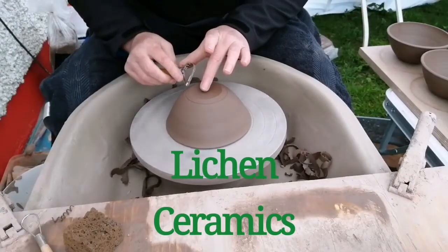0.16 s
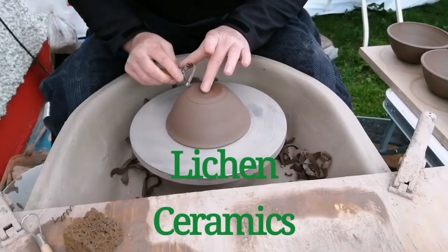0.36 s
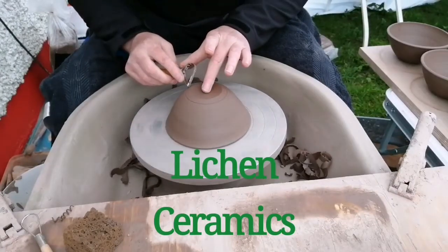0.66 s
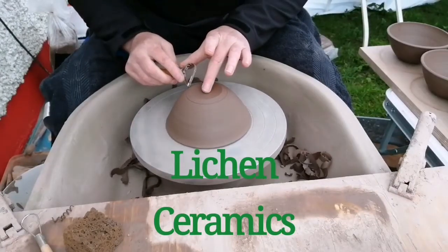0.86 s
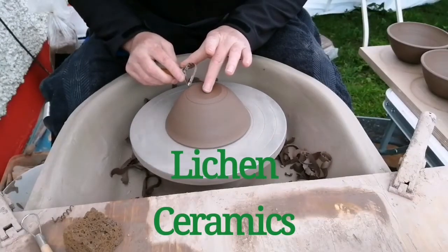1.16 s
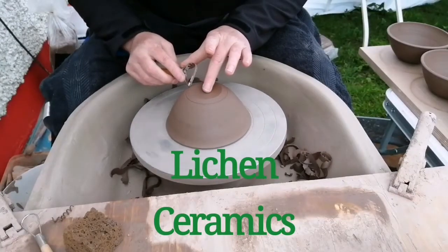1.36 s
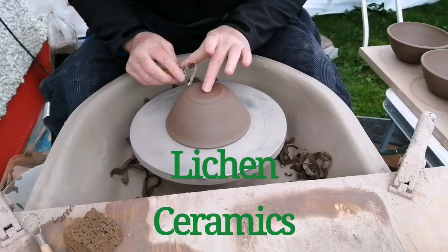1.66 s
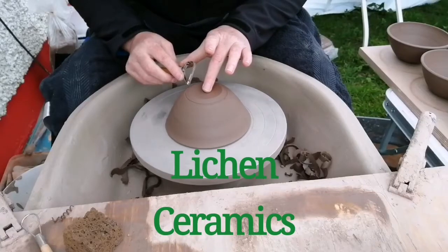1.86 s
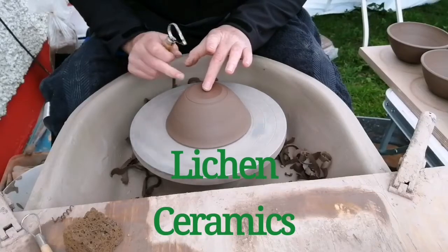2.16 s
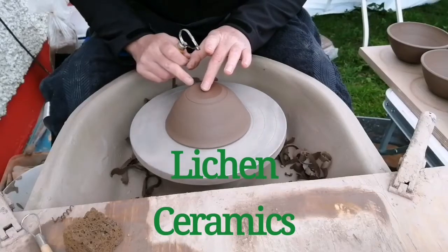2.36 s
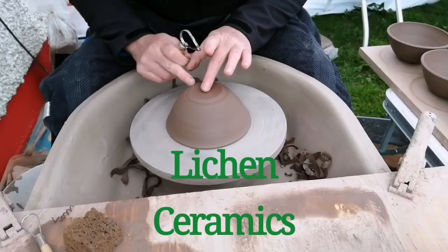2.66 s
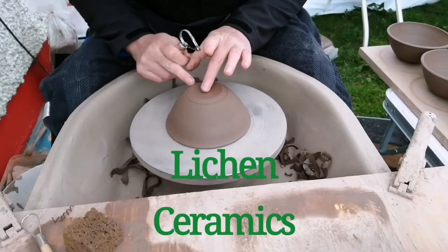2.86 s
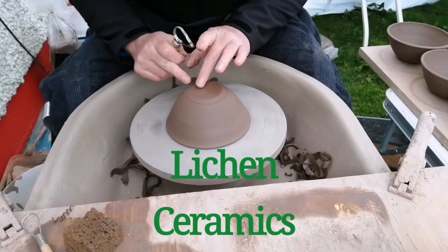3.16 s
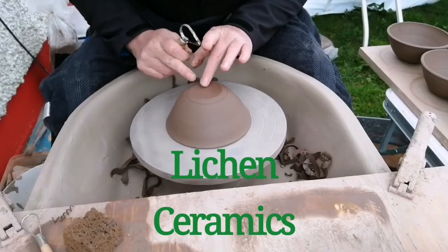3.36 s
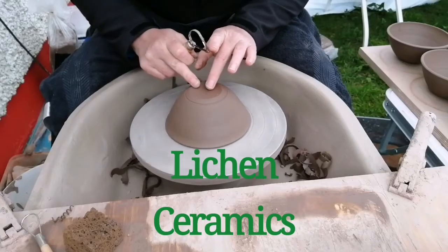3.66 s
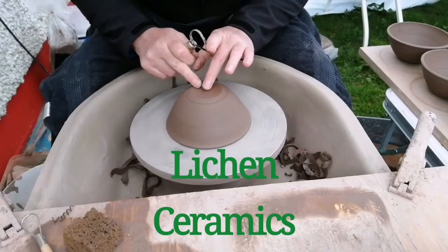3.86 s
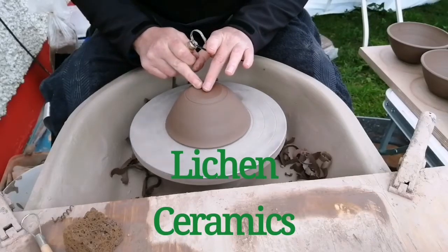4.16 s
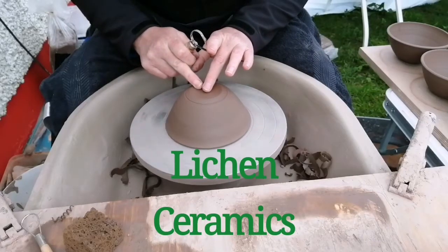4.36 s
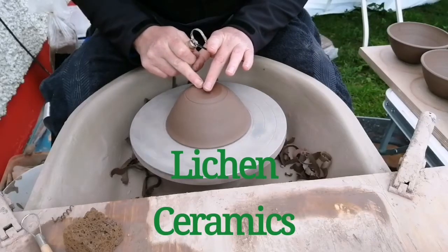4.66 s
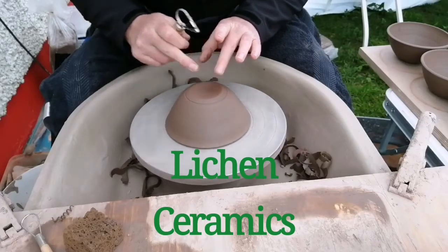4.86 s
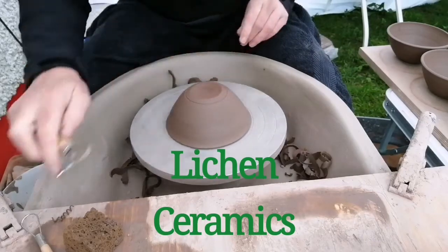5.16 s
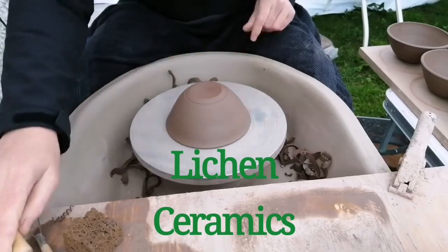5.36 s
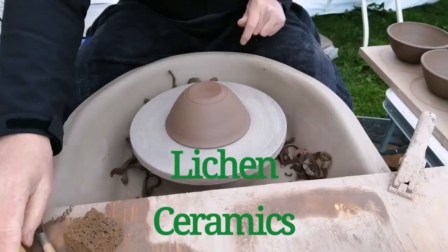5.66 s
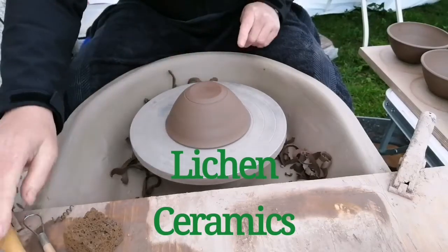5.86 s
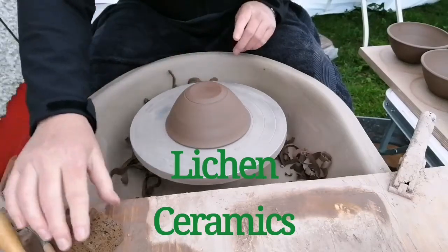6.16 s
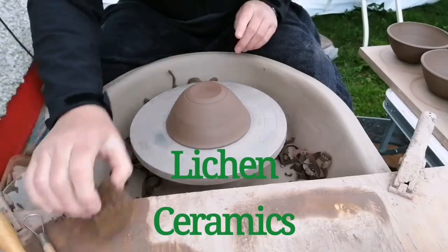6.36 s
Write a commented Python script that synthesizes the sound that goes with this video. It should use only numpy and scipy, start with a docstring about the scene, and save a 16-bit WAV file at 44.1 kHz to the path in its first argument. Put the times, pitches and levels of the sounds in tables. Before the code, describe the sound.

Close up in a garden, an electric potter's wheel runs with a low, beating hum and soft belt thumps several times a second. Halfway through, a distant small bird gives a falling run of thin whistles and buzzy notes, echoing off walls. Then a sleeve swishes, a dull thud and knocks sound on a plastic tray, the wheel slows and stops, leaving faint mains hum, and a steel tool lands with a sharp, bright clink.

```python
"""In a garden, an electric potter's wheel turns: bumps in its belt thump the housing and beat against the motor's hum.
A small bird sings a falling run of whistles and two groups of buzzes among echoing walls. The potter reaches out
with a swish of the sleeve, the wheel stops, leaving the mains hum, and a steel trimming tool is put down with knocks
and a sharp clink. Pitched sounds are built from sine waves and ringing modes, hisses from shaped noise."""
import sys
import numpy as np
from scipy import signal
from scipy.fft import rfft, irfft, next_fast_len
from scipy.io import wavfile
from scipy.ndimage import map_coordinates

SR = 44100
rng = np.random.default_rng(int(sys.argv[2]) if len(sys.argv) > 2 else 0)


def transcribe(u):
    """Save the signal u as a 16-bit wav file named by the first command-line argument.

    u: samples, shape (n,) or (channels, n), limited to [-1, 1]; the rate is SR.
    q: integer samples, one column per channel.
    """
    v = np.clip(np.atleast_2d(u).T, -1, 1)
    q = np.round(v * 32767).astype(np.int16)
    wavfile.write(sys.argv[1], SR, q)


N = 287091
T = np.arange(N) / SR  # time of every sample [s]


def amp(db):
    """Turn decibels into a gain."""
    return 10 ** (np.asarray(db) / 20)


def unit(x):
    """Scale a sound to an average (rms) strength of 1."""
    return x / np.sqrt(np.mean(x ** 2) + 1e-20)


def along(points, hz):
    """Read a curve of (Hz, value) points, joined by straight lines on a log frequency axis."""
    f, v = np.transpose(points)
    return np.interp(np.log(hz + 1), np.log(f + 1), v)


def wobble(rate):
    """A smooth random curve with so many random points a second."""
    knots = rng.standard_normal(int(N * rate / SR) + 4)
    return map_coordinates(knots, [T * rate])


def filtered(x, response):
    """Multiply the spectrum of x by a response that depends on frequency."""
    m = next_fast_len(N + SR // 2)
    hz = np.fft.rfftfreq(m, 1 / SR)
    return irfft(rfft(x, m) * response(hz), m)[..., :N]


def pan(db):
    """Left and right gains for a level difference; positive leans left."""
    return amp(np.array([[.5], [-.5]]) * db)


def add(track, s, sound):
    """Mix a stereo sound into the track at time s."""
    part = track[:, round(s * SR):][:, :sound.shape[1]]
    part += sound[:, :part.shape[1]]


def fade(s, t60, attack):
    """Loudness curve of a blow at time s: a quick rise, then a drop of 60 dB in t60 seconds."""
    age = np.maximum(T - s, 0)
    return amp(-60 * np.minimum(age / t60, 3)) * (1 - np.exp(-age / attack))


def tones(rows, turns, scatter=0, waver_db=0):
    """Cosines at multiples of a count of turns; scatter sets them out of step, and each wavers on its own."""
    total = 0
    for multiple, db in rows:
        level = amp(db + waver_db * wobble(11))
        total = total + level * np.cos(2 * np.pi * (round(multiple) * turns + scatter * rng.random()))
    return np.sqrt(2) * total


def ring(modes, attack, pitch=1, sustain=1):
    """Fading sine modes, struck at new strengths each time; higher ones reach the two ears less alike."""
    t = np.arange(SR // 3) / SR
    waves = 0
    for k, (hz, db, t60) in enumerate(modes):
        level = amp(db + rng.normal(0, 1.9) - 60 * t / (t60 * sustain))
        ear_phase = rng.normal(0, hz / 900, (2, 1))
        waves = waves + (-1) ** k * level * np.sin(2 * np.pi * pitch * hz * t + ear_phase)
    return waves * (1 - np.exp(-t / attack)) / np.sqrt(len(modes) / 2)


# How alike noise is in the two ears: (frequency [Hz], likeness [0 to 1])
EAR_LIKENESS = [(40, 0.82), (150, 1), (300, 0.96), (550, 0.66), (1000, 0), (2000, 0.069), (5000, 0),
                (15000, 0)]
# How noise leans to the left: (frequency [Hz], left-right difference [dB])
NOISE_LEAN = [(30, 5), (60, 8), (150, -3.5), (300, -2.5), (600, 1), (1200, 3), (2500, 1.5), (6000, 4.5),
              (7800, -3), (10000, -0.5), (15000, 4)]


def rush(spectrum, ripple_db=0):
    """Stereo noise of rms 1, alike in the bass and unrelated in the treble; nearby surfaces ripple its spectrum."""
    def mid_and_side(hz):
        turn = np.arccos(np.clip(along(EAR_LIKENESS, hz), -1, 1)) / 2
        return amp(along(spectrum, hz)) * [np.cos(turn), np.sin(turn)]

    def lean_and_ripple(hz):
        # a separate ripple for each ear, with a random point every 25 Hz
        ripple = np.array([map_coordinates(row, [hz / 25]) for row in rng.standard_normal((2, SR // 25))])
        return pan(along(NOISE_LEAN, hz)) * amp(ripple_db * ripple)

    mid, side = filtered(rng.standard_normal((2, N)), mid_and_side)
    return unit(filtered(np.array([mid + side, mid - side]), lean_and_ripple))


EASE_S, HALT_S = 5.4, 6.06  # the pedal is eased, then the wheel halts [s]


def coasting():
    """0 while the pedal is down, rising to 1 as the wheel halts."""
    return np.clip((T - EASE_S) / (HALT_S - EASE_S), 0, 1)


COAST_LOSS_DB = -12  # the drive's change in level by the end of the coast
HALT_T60 = 0.46  # time to drop a further 60 dB after the halt [s]


def effort_db():
    """The drive quietens as it coasts and dies away at the halt."""
    return COAST_LOSS_DB * coasting() - 60 * np.maximum(T - HALT_S, 0) / HALT_T60


BELT_HZ, MOTOR_HZ = 5.3832, 24.897  # belt loops and motor turns a second, before the coast
MOTOR_START = .0362  # moment that sets the motor's phase [s]
COAST_SLOWING = .1  # share of the speed lost during the coast
# Bumps in one loop of the belt: (time into the loop [s], relative level [dB])
BELT_BUMPS = [(.0246, 0), (.0393, 1.3), (.1179, -.9)]
# Ringing modes of the wheel housing: (frequency [Hz], width [Hz], relative level [dB])
HOUSING_MODES = [(124, 41, 7), (153.53, 10.8, 22.5), (169.5, 10.3, 15), (196, 5.5, 13.5), (237, 5.7, 13.5),
                 (76.3, 43, -3), (285, 67, -7.5)]
# Hum of the motor: (multiple of its turning speed [count], rms level [dB])
MOTOR_ORDERS = [(5, -63), (6, -48.5), (8, -60.5), (12, -68), (15, -73.5)]
# Grinding noise of the bearings: (frequency [Hz], relative level per hertz [dB])
GRIND_SPECTRUM = [(30, -32), (70, -14), (190, -4), (300, -6.5), (350, -12), (410, -4.5), (465, -10),
                  (540, -10.5), (700, -10.5), (1250, -21), (2100, -26), (5000, -42.5), (8000, -57)]


def drive(belt_db=-1.0, scatter_db=1.0, grind_db=-57, chafe_db=-53, pulse_db=3.0, soft_hz=1500, flutter_turns=0.01):
    """Belt bumps ring the housing; the motor's sixth order lies close to that ring, so the two beat."""
    run_time = np.cumsum(1 - COAST_SLOWING * coasting()) / SR  # a clock that slows with the wheel
    loops = np.arange(int(run_time[-1] * BELT_HZ)) / BELT_HZ
    blows = np.zeros(N)
    for s, db in BELT_BUMPS:
        blows[np.searchsorted(run_time, loops + s)] += amp(db + scatter_db * rng.standard_normal(len(loops)))

    def housing(f):
        return sum((-1) ** k * amp(db) * 1j * f * width / (hz * hz - f * f + 1j * f * width)
                   for k, (hz, width, db) in enumerate(HOUSING_MODES))

    # soft rubber blows carry little treble
    thumps = amp(belt_db) * filtered(blows, lambda f: housing(f) / (1 + (f / soft_hz) ** 2))
    # the belt rubs on between bumps
    chafe = amp(chafe_db) * unit(filtered(rng.standard_normal(N), housing))
    turns = MOTOR_HZ * (run_time - MOTOR_START)
    motor = tones(MOTOR_ORDERS, turns + flutter_turns * wobble(12), waver_db=0.5)
    # the bearings grind harder once per motor turn and once per belt loop
    motor_load = np.cos(2 * np.pi * turns)
    belt_load = np.cos(2 * np.pi * BELT_HZ * (run_time - BELT_BUMPS[-1][0]))
    grind = amp(grind_db + pulse_db * (motor_load + belt_load)) * rush(GRIND_SPECTRUM, ripple_db=3.5)
    return amp(effort_db()) * (pan(3.4) * (thumps + chafe + motor) + grind)


FLUTTER_PER_CYCLE = 0.025  # flutters per cycle of the pitch: higher notes flutter faster


def note(length, end_hz, db, slide, swing_hz, pulse_db, uneven=0.4, quaver_db=3.0, overtone_db=-21, settle=4):
    """One whistle that swoops down towards its pitch and flicks up again and again, loudest as each flick falls."""
    t = np.arange(int(length * SR)) / SR
    flutter = 2 * np.pi * (FLUTTER_PER_CYCLE * end_hz * t + uneven * wobble(49.23)[:len(t)])
    swoop = end_hz * (1 + slide * np.exp(-settle * t / length))
    flicks = swing_hz * ((1 + np.sin(flutter)) / 2) ** 2
    phase = 2 * np.pi * np.cumsum(swoop + flicks) / SR
    reedy = end_hz * (1 + slide) < 3400  # only the lowest notes have an overtone
    overtone = amp(overtone_db) * np.sin(3 * phase) * reedy
    pulses = unit(amp(quaver_db * wobble(68)[:len(t)] - pulse_db * np.cos(flutter)))
    edges = signal.windows.tukey(len(t), .45)
    return np.sqrt(2) * amp(db) * pulses * edges * (np.sin(phase) + overtone)


# How long the garden's echo lasts: (frequency [Hz], time to drop 60 dB [s])
GARDEN_ECHO = [(3200, 0.8), (6000, 0.65), (8000, 0.41)]
ECHO_RISE_S = 0.013  # the diffuse echo takes a moment to build


def echo(x, clump_db=4):
    """Walls and trees throw a sound back in uneven clumps; each frequency dies at its own speed."""
    hz, t, noise = signal.stft(rng.standard_normal((2, SR * 3 // 4)), SR, nperseg=256)
    clumps = clump_db * rng.standard_normal(len(t))
    decay = amp(clumps - 60 * t / along(GARDEN_ECHO, hz)[:, None])
    tail = signal.istft(noise * (1 - np.exp(-t / ECHO_RISE_S)) * decay, SR, nperseg=256)[1]
    return signal.fftconvolve(x[None], tail / np.linalg.norm(tail[0]), axes=1)


# Three tables of notes, each with the columns (time [s], length [s], pitch the swoop nears [Hz],
# relative level [dB], downward slide [share of the pitch]).
# Single whistles, the last two sung above the low buzzes
SINGLE_WHISTLES = [(3.1, 0.11, 6950, -58, 0.03), (3.21, 0.068, 6180, -55.5, 0.23),
                   (3.33, 0.026, 5090, -63, 0.074), (3.427, 0.031, 5650, -58, 0.035),
                   (3.9, 0.0713, 3112, -46, 0.038), (3.995, 0.031, 2540, -55, 0.265),
                   (4.035, 0.053, 7000, -63.5, 0.089), (4.255, 0.029, 5070, -65, 0.012),
                   (4.843, 0.064, 3820, -60, 0.012), (5.058, 0.024, 3776, -50, 0.022)]
# Downward swoops: a falling run, and two more that end the song
FALLING_RUN = [(3.455, 0.083, 6630, -46.5, 0.11), (3.535, 0.05, 5330, -50.5, 0.2),
               (3.612, 0.05, 4620, -54.5, 0.35), (3.692, .06, 3583, -50, .5),
               (3.785, 0.053, 2835, -51, 0.32), (5.066, 0.0403, 2920, -48.5, 0.31),
               (5.14, 0.12, 3125, -53.5, 0.049)]
# Closing buzzes, first high, then low
CLOSING_BUZZES = [(4.325, .06, 7280, -59, 0.0088), (4.368, 0.075, 7050, -50, 0.11),
                  (4.5, 0.105, 7350, -49, 0.018), (4.68, 0.098, 7230, -48, 0.04),
                  (4.85, 0.1, 2880, -54, 0.3), (4.97, 0.08, 3080, -55.5, 0.22)]
# How the bird reaches the two ears: (frequency [Hz], left-right difference [dB])
SONG_LEAN = [(3000, 2.5), (6900, 5.5), (7400, -3.5)]
WHISTLE_SWING_HZ, RUN_SWING_HZ, BUZZ_SWING_HZ = 101.6, 250, 558  # how far the pitch flicks up
WHISTLE_PULSE_DB, BUZZ_PULSE_DB = 1.5, 2.5  # how deeply the flutter chops a note
BOUNCE_S, BOUNCE_LOSS_DB = .04, 4.5  # round trip between two facing walls, and the loss on each


def bird(direct_db=-6.5, echo_db=-0.5):
    """Whistles, a falling run and buzzes from far off, heard mostly through their echoes."""
    song = np.zeros((2, N))
    for rows, swing_hz, pulse_db in [(SINGLE_WHISTLES, WHISTLE_SWING_HZ, WHISTLE_PULSE_DB),
                                     (FALLING_RUN, RUN_SWING_HZ, WHISTLE_PULSE_DB),
                                     (CLOSING_BUZZES, BUZZ_SWING_HZ, BUZZ_PULSE_DB)]:
        for s, length, hz, db, slide in rows:
            call = note(length, hz, db, slide, swing_hz, pulse_db)
            sides = pan(along(SONG_LEAN, hz))
            for trip in range(4):  # trip 0 is the direct sound
                arrival = s + trip * BOUNCE_S + .001 * rng.random()
                add(song, arrival, sides * amp(direct_db - BOUNCE_LOSS_DB * trip) * call)
            add(song, s, sides * amp(echo_db) * echo(call))
    return song


# Knocks on the splash tray: (time [s], dull thud level [dB], hard tap level [dB],
# pitch of the thud [ratio], ring time of the thud [ratio])
TRAY_KNOCKS = [(5.408, -38, -63, 0.64, 0.9), (5.4498, -19.5, -46, 0.916, 0.45),
               (5.476, -34, -44, 1.02, 1.2), (5.512, -31.5, -48.5, 0.8, 0.69),
               (5.608, -42.5, -45.5, 1.05, 1), (5.737, -48.5, -34.5, 1, 1.2),
               (5.836, -37.5, -29, 1.03, 0.87), (5.848, -37, -31, 1.2, 0.6),
               (5.876, -35.5, -51, 0.68, 0.87), (6.348, -35.5, -44, 1, 0.87)]
# Low modes of the tray, before each knock's ratios: (frequency [Hz], relative level [dB], time to drop 60 dB [s])
THUD_MODES = [(166.3, -3, 0.28), (234.5, 7, 0.2), (310, -5, 0.051), (386.5, -6.5, 0.2), (434, -6.5, 0.15),
              (614, -11.5, 0.15)]
# High modes of the tray: (frequency [Hz], relative level [dB], time to drop 60 dB [s])
TAP_MODES = [(441, 0.5, 0.05), (583.7, 1.5, 0.096), (667, 4.5, 0.056), (753, 3, 0.068), (833, 0.5, 0.06),
             (986, -7.5, 0.069), (1094, -18, .09), (1450, -9.5, 0.045)]
# Loose things rattling on the tray: (frequency [Hz], relative level per hertz [dB])
RATTLE_SPECTRUM = [(300, 12.5), (800, 10), (1450, -5.5), (1850, 4), (2900, 5.5), (4000, -6.5),
                   (15000, -19.5)]
# Loose tools touch each other: (time [s], tick level [dB], jingle level [dB])
TOOL_TICKS = [(5.323, -44, -66), (5.739, -47.5, -58), (5.838, -60, -46), (5.875, -71, -50)]
# Modes of the tick: (frequency [Hz], relative level [dB], time to drop 60 dB [s])
TICK_MODES = [(1560, -7.5, 0.17), (1600, 4.5, 0.046), (1420, -2, 0.03)]
# Modes of the jingle: (frequency [Hz], relative level [dB], time to drop 60 dB [s])
JINGLE_MODES = [(1836, -10, 0.14), (2290, -2, 0.084), (2740, -3, 0.095), (2980, -4, .12)]


def tray(rattle_db=-17):
    """Knocks on the plastic tray: soft blows thud, hard ones tap and rattle, and loose tools tick and jingle."""
    knocks, rattle = np.zeros((2, N)), np.zeros(N)
    for s, thud_db, tap_db, pitch, sustain in TRAY_KNOCKS:
        thud = ring(THUD_MODES, attack=0.0081, pitch=pitch, sustain=sustain)
        add(knocks, s, pan(1.3) * amp(thud_db) * thud)
        add(knocks, s, pan(6.0) * amp(tap_db) * ring(TAP_MODES, attack=0.0018))
        rattle += amp(tap_db + rattle_db) * fade(s, t60=0.25, attack=0.00091)
    for s, tick_db, jingle_db in TOOL_TICKS:
        tick = amp(tick_db) * ring(TICK_MODES, attack=0.0011)
        jingle = amp(jingle_db) * ring(JINGLE_MODES, attack=.001)
        add(knocks, s, pan(2.5) * (tick + jingle))
    return knocks + rattle * rush(RATTLE_SPECTRUM)


# Hiss of sliding cloth, which also colours the tool's crack: (frequency [Hz], relative level per hertz [dB])
CLOTH_SPECTRUM = [(800, -10), (2000, 3.5), (4500, 2.5), (5800, 6), (6800, 13.5), (8500, 1.5), (12000, -3),
                  (15000, 2), (16000, -33)]
# Ring of the steel tool: (frequency [Hz], relative level per hertz [dB])
STEEL_SPECTRUM = [(1200, -20), (2200, -20), (2680, -1), (3100, -10), (4200, -16), (4900, -1), (5700, 6.5),
                  (6500, -2.5), (7500, -1.5), (9000, -16.5), (10300, -15.5), (12000, -36), (14500, -18),
                  (16000, -30)]
CLINK_S = 6.3431  # the tool touches down [s]
CONTACT_DB, CLINK_RING_DB = -21.5, -31  # level of the squeak; gain of the crack and ring together


def tool(squeak_hz=5680, length=0.0052, t60=0.39, crack_db=4):
    """The steel tool skids with a brief squeak and a crack, then its crowded modes, made of noise, ring out."""
    crack = amp(crack_db) * fade(CLINK_S + 0.0007, t60=0.0096, attack=0.0015) * rush(CLOTH_SPECTRUM)
    ring_fade = fade(CLINK_S + 0.00086, t60, attack=0.00064)
    ringing = amp(wobble(150)) * ring_fade * rush(STEEL_SPECTRUM, ripple_db=2.5)
    sound = amp(CLINK_RING_DB) * (crack + ringing)
    t = np.arange(int(length * SR)) / SR
    squeak = np.sin(np.pi * (t / length) ** 2.6) * np.sin(2 * np.pi * squeak_hz * t)
    add(sound, CLINK_S, pan(13) * amp(CONTACT_DB) * squeak)
    return sound


# Rubs of fingers on clay, then of the sleeve: (middle [s], length [s], level [dB])
HAND_RUBS = [(.1, 0.28, -69.5), (2.33, 0.054, -73), (3.8, 0.41, -65.5), (5.304, 0.2, -60),
             (5.453, 0.33, -53.5), (6.14, 0.26, -72)]
RUB_EDGE, RESTING_DB = 3.35, -71  # steepness of a rub's rise and fall; the light touch between rubs


def rubbing(flicker_db=1.5):
    """Fingers hiss faintly on the clay; smooth jacket cloth slides as the arm reaches out. Each rub swells and fades."""
    swells = sum(amp(db) / (1 + np.abs(2 * (T - s) / length) ** RUB_EDGE) for s, length, db in HAND_RUBS)
    return (amp(RESTING_DB) + swells) * amp(flicker_db * wobble(30)) * rush(CLOTH_SPECTRUM)


HALTED_HUM_DB, HUM_SWELL_S = 3.5, 0.14  # size and duration of the rise once the wheel has stopped


def swell():
    """Gain of the hum and fan, which rises after the halt."""
    return amp(HALTED_HUM_DB * np.clip((T - HALT_S) / HUM_SWELL_S, 0, 1))


MAINS_HZ = 50
# Mains hum: (multiple of the mains frequency [count], relative rms level [dB])
MAINS_HARMONICS = [(2, -58.5), (6, -66), (8, -70.5), (10, -77.5), (14, -74.5), (18, -77)]
# Tones of the fan: (frequency [Hz], typical rms level [dB])
FAN_TONES = [(523, -69.5), (996, -73.5), (1022, -75.5), (1095, -80.5), (1992, -84.5)]
# Rushing noise of the fan: (frequency [Hz], relative level per hertz [dB])
FAN_SPECTRUM = [(20, -14.5), (230, -11), (350, -17.5), (420, -5.5), (465, -13), (520, 2), (700, -8.5),
                (830, -13), (1000, -10.5), (1200, -17.5), (4000, -42.5)]


def idle(mains_db=-1, fan_db=-57, drift=0.21):
    """Mains hum and the cooling fan's wavering tones and noise go on whether the wheel turns or not."""
    mains_turns = MAINS_HZ * T + 0.0019 * wobble(6.6)
    hum = amp(mains_db) * tones(MAINS_HARMONICS, mains_turns, scatter=0.97, waver_db=3.0)
    whine = np.zeros(N)
    for hz, db in FAN_TONES:
        level = np.sqrt(2) * amp(db + 3.6 * wobble(7))
        whine += level * np.sin(2 * np.pi * (hz * T + drift * wobble(20)))
    return pan(7.3) * (hum + whine) + amp(fan_db) * rush(FAN_SPECTRUM, ripple_db=1.5)


# Hiss of the garden air: (frequency [Hz], relative level per hertz [dB])
AIR_SPECTRUM = [(700, -55), (1350, 4.5), (1700, -7), (2000, 0.5), (3000, -3), (3720, -11), (5430, -5.5),
                (7270, -4.5), (9120, -21), (13600, -66), (14800, -31), (15800, -84)]


def garden_air(air_db=-66):
    """The garden's steady hiss is noise with a rippled spectrum."""
    return amp(air_db) * rush(AIR_SPECTRUM, ripple_db=5.0)


def scene():
    """Wheel, bird and potter over the hum and the garden's hiss."""
    return drive() + bird() + tray() + tool() + rubbing() + swell() * idle() + garden_air()


TOP_HZ = 15800


def record(dry):
    """Cut off everything from the top frequency upwards."""
    return filtered(dry, lambda hz: hz < TOP_HZ)


dry = scene()
out = record(dry)
transcribe(out)
```